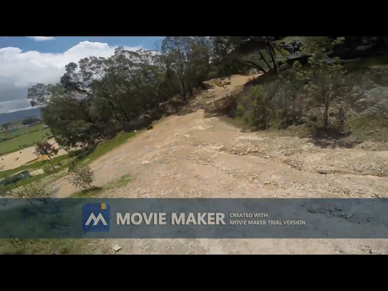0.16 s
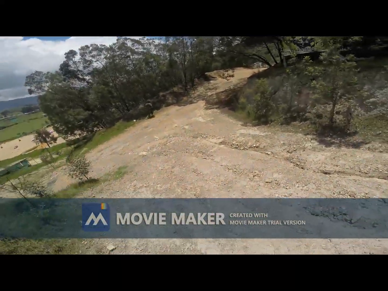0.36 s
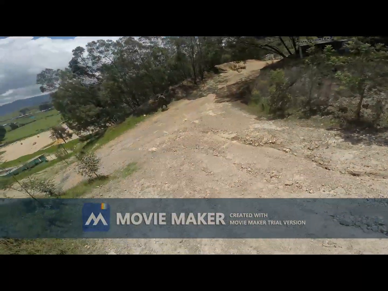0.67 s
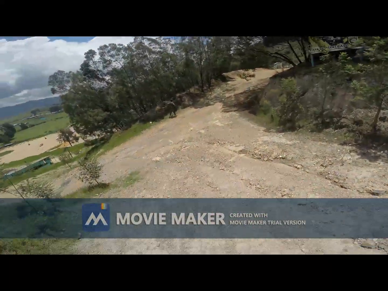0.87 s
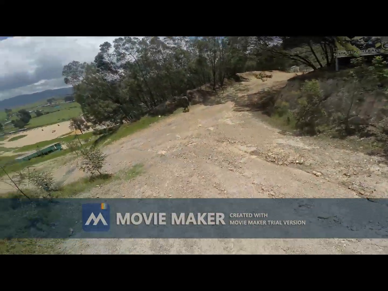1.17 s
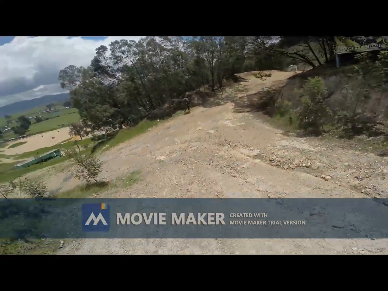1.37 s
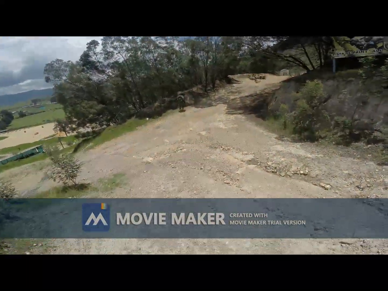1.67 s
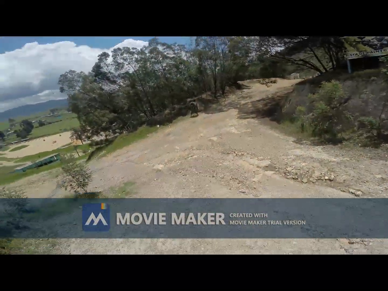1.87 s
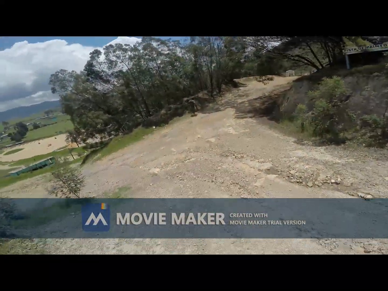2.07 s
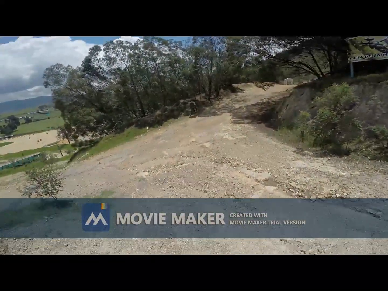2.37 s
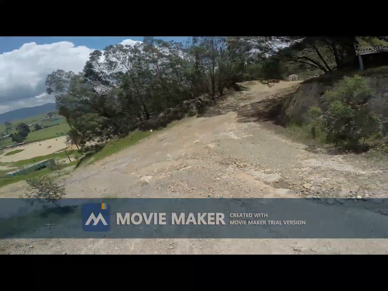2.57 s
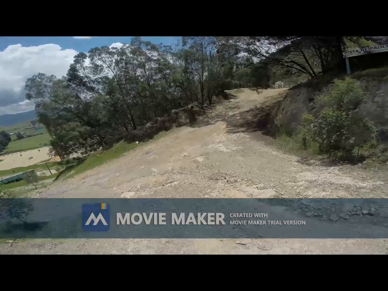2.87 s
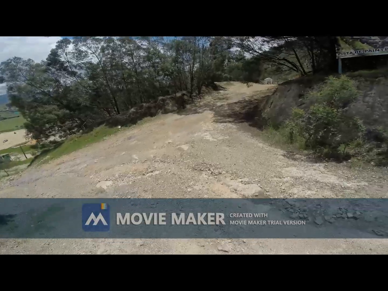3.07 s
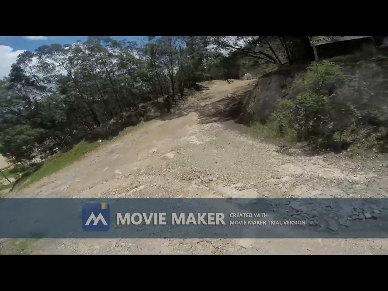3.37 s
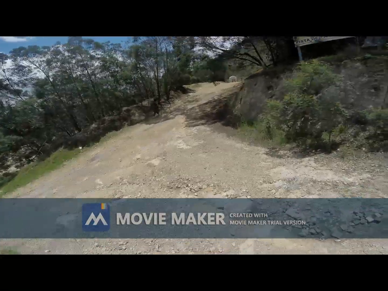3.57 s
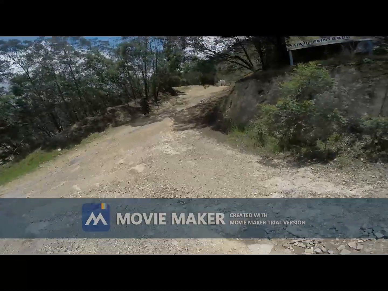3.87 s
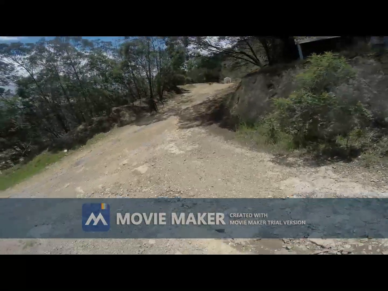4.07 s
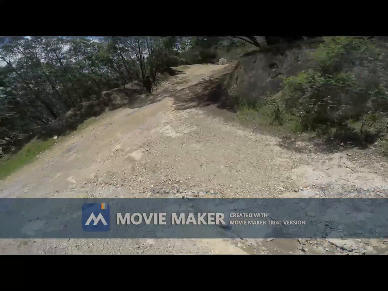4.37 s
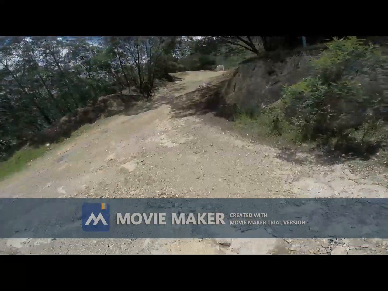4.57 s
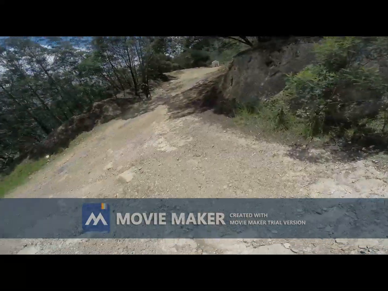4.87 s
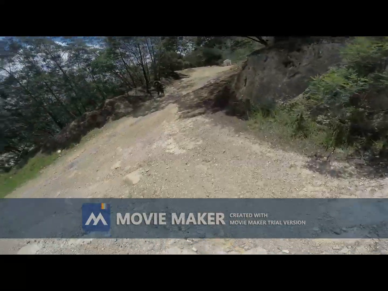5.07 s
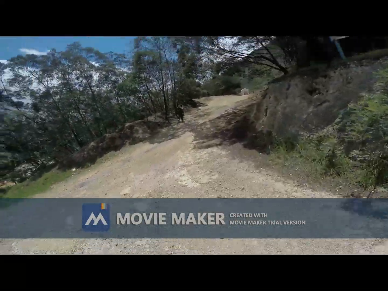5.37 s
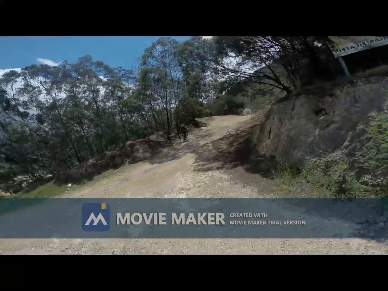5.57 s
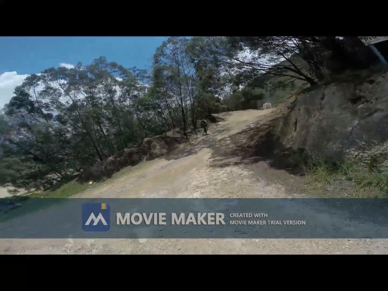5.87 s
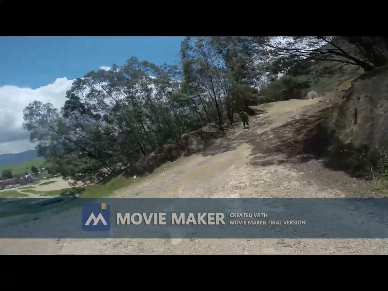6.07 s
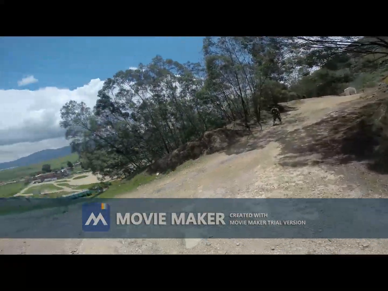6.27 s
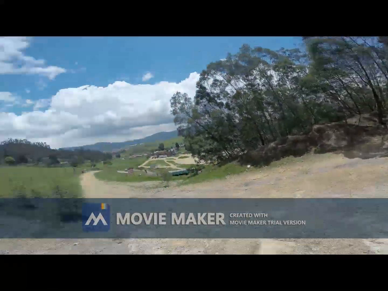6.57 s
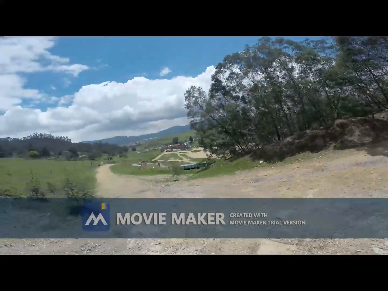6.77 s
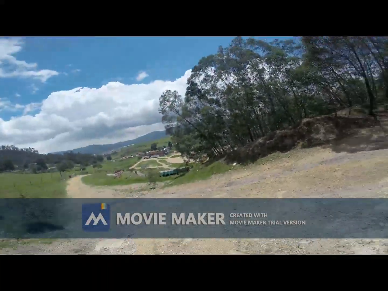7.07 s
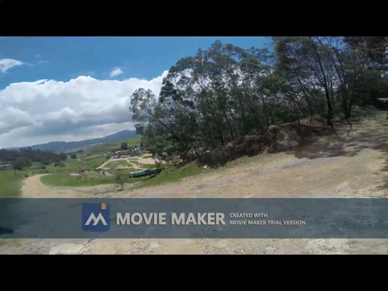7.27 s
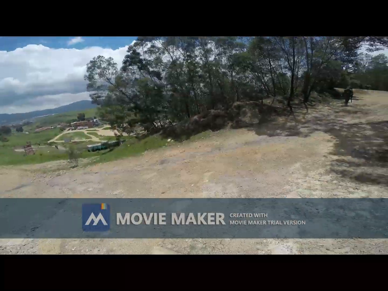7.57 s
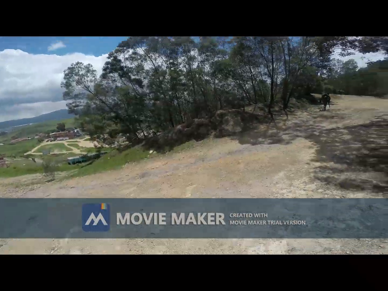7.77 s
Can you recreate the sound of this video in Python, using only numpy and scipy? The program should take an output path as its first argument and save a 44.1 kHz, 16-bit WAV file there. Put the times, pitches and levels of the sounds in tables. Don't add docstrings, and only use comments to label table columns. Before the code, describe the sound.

A faint steady amplifier hiss with very thin high whines runs throughout. From about 0.2 s a hurrying person's strides shake a sealed, chest-worn camera: deep, close thuds that wobble below the bass, a loose joint knocking, low lumpy strap rub and dry plastic ticks. Light gritty ticks come near 0.5 s and a bright case slap at 0.93. Strong thuds and knocks follow at about 1.3, 1.9, 2.25 and 2.95 s, the last with slaps and crisp grit. Bumps continue at 3.25 and 3.65, then soften from 4 to 5 s, mostly low sways and small ticks. Heavy knocks return at 5.35, 5.9 and 6.4. A kicked stone makes a small double crack at 6.57 s with a short scattered echo; more thuds at 6.95 and 7.4 bring a loose plastic slap, a fainter stone crack follows at 7.64, and a last low bounce lands near 7.9.

```python
import sys
import numpy as np
from scipy import signal
from scipy.fft import rfft, irfft, next_fast_len
from scipy.io import wavfile
from scipy.ndimage import map_coordinates

SR = 44100
rng = np.random.default_rng(int(sys.argv[2]) if len(sys.argv) > 2 else 0)


def master(y):
    cut = np.clip(np.atleast_2d(y).T, -1, 1)
    pcm = np.round(cut * 32767)
    wavfile.write(sys.argv[1], SR, pcm.astype(np.int16))


def voltage_ratio(decibels):
    exponent = np.asarray(decibels, float) / 20
    return 10 ** exponent


N = 349868

# start in seconds, peak in dB, recoil in Hz.
KNOCKS = [(0.218, -12, 92), (1.018, -12.5, 84), (1.2875, -3, 91), (1.594, -12.5, 98), (1.93, -5, 100),
          (2.2664, -4.5, 94.6), (2.333, -15.5, 79), (2.768, -18, 93), (2.9684, -4, 90), (3.155, -17, 102),
          (3.213, -22.5, 80), (3.376, -16.5, 97), (3.687, -5, 100), (3.766, -11, 92), (4.159, -8.5, 90.5),
          (5.377, -4, 92), (5.928, -5.5, 98.4), (6.409, -2.5, 97), (6.481, -8.5, 92), (6.965, -9.5, 81.6),
          (7.532, -15.5, 90)]


def unit(x):
    return x / np.sqrt(np.mean(x ** 2) + 1e-20)


def coloured(x, spectrum):
    m = next_fast_len(len(x) + 8192)
    hz, db = np.transpose(spectrum)
    log_f = np.log(np.fft.rfftfreq(m, 1 / SR) + 1)
    gain = voltage_ratio(np.interp(log_f, np.log(hz + 1), db))
    return irfft(rfft(x, m) * gain, m)[:len(x)]


def band(x, low_hz, high_hz):
    return signal.sosfilt(signal.butter(4, [low_hz, high_hz], "band", fs=SR, output="sos"), x)


def wobble(rate):
    return map_coordinates(rng.standard_normal(int(N * rate / SR) + 4), [np.arange(N) * rate / SR])


def add(track, s, sound):
    part = track[round(s * SR):][:len(sound)]
    part += sound[:len(part)]


def ring(modes, t, t60):
    out = np.zeros(len(t))
    for hz, db in modes:
        decay = voltage_ratio(db + rng.normal(0, 3) - 60 * t / t60)
        out += decay * np.sin(2 * np.pi * hz * rng.normal(1, .025) * t)
    return out


def camera():
    # frequency in Hz, density in dB per Hz.
    hiss_spectrum = [(100, -30), (200, 0.0), (300, -2.0), (500, -6.0), (900, -9.0), (1500, -12.0),
                     (2200, -14.0), (3300, -14.0), (4300, -19.0), (6000, -22.0), (7000, -25.0),
                     (9500, -29.0), (12500, -35.0), (15800, -46.0)]
    # frequency in Hz, level in dB.
    whines = [(5844, -80), (8781, -77), (11688, -88), (11718, -82), (14626, -90)]
    hiss = voltage_ratio(-58 + wobble(3)) * unit(coloured(rng.standard_normal(N), hiss_spectrum))
    t = np.arange(N) / SR
    whine = sum(voltage_ratio(db + wobble(8)) * np.sin(2 * np.pi * hz * t) for hz, db in whines)
    return hiss + whine


def clothes():
    # time of the peak in seconds, peak in dB.
    rubs = [(0.22, -28.5), (1.06, -38), (1.319, -26), (1.591, -24), (1.922, -18.5), (2.36, -27.5),
            (2.6, -32), (3.09, -34), (3.31, -26), (3.661, -26), (4.04, -43), (4.2, -27.5), (4.5, -38.5),
            (4.86, -37), (5.46, -37.5), (5.922, -18.5), (6.342, -33), (6.52, -23), (7.0, -24.5),
            (7.44, -20.5), (7.92, -28)]
    # frequency in Hz, density in dB per Hz.
    cloth_spectrum = [(20, -27), (40, 3), (90, -8.5), (150, -16), (220, -29), (320, -30.5), (700, -56.5),
                      (1500, -120)]
    rise_db_per_s, fall_db_per_s, rustle_db = 168.5, 179, -49
    t = np.arange(N) / SR
    drag = voltage_ratio(rustle_db)
    for s, db in rubs:
        drag = drag + voltage_ratio(db + np.minimum(rise_db_per_s * (t - s), fall_db_per_s * (s - t)))
    lumps = voltage_ratio(5.1 * wobble(25))
    return drag * unit(lumps * coloured(rng.standard_normal(N), cloth_spectrum))


def stones():
    # start in seconds, peak in dB.
    kicks = [
        (6.567, -24),
        (7.638, -29.5),
    ]
    # frequency in Hz, density in dB per Hz.
    stone_spectrum = [(900, -19), (1500, -7.5), (2000, -12.5), (2500, -6), (3100, 4), (3700, -8.5),
                      (4600, -26.5), (5500, -17.5), (6300, -9.5), (7000, -16.5), (7600, -17),
                      (10400, -30.5), (13000, -28), (15800, -75)]
    far_spectrum = [(hz, .72 * db) for hz, db in stone_spectrum]
    out, t = np.zeros(N), np.arange(SR // 2) / SR
    for s, db in kicks:
        crack = np.tanh(t / .001) * voltage_ratio(-4 - 60 * t / .011)
        crack += voltage_ratio(-60 * np.abs(t - .0035) / .008)
        scatter = voltage_ratio(-13 - 60 * t / .09)
        bank = voltage_ratio(-31 - 60 * t / .45) + voltage_ratio(-36) * np.exp(-((t - .075) / .025) ** 2)
        near = (crack + scatter) * unit(coloured(rng.standard_normal(len(t)), stone_spectrum))
        far = bank * unit(coloured(rng.standard_normal(len(t)), far_spectrum))
        add(out, s, voltage_ratio(db) * (near + far))
    return out


def contacts():
    # start in seconds, walls in dB.
    taps = [(0.1778, -45), (0.226, -42.5), (0.333, -51.5), (0.56, -45), (0.5902, -38), (0.9815, -39),
            (1.2723, -36), (1.9078, -37.5), (1.97, -44), (2.3045, -45), (2.4454, -51.5), (2.531, -42.5),
            (2.9354, -31), (3.0048, -45), (3.6474, -42), (4.819, -39), (6.362, -38), (6.3902, -41),
            (6.4315, -45), (6.4494, -46), (6.551, -40.5), (6.9045, -37.5), (7.082, -41), (7.8926, -45)]
    # start in seconds, walls in dB.
    ticks = [(1.1374, -45), (1.2454, -43), (1.2532, -40), (1.5495, -38), (1.5724, -41), (1.6049, -39),
             (1.981, -45), (2.6106, -47.5), (3.279, -43.5), (4.061, -48), (4.075, -47), (4.0965, -48),
             (4.3711, -44.5), (4.9888, -49), (5.851, -49), (5.8645, -47.5), (5.909, -51), (5.961, -39),
             (6.3409, -44), (6.509, -52), (6.689, -50.5), (7.4714, -44), (7.912, -50)]
    # start in seconds, walls in dB, lid over walls in dB, slack in seconds.
    slaps = [
        (0.9344, -22, -0.5, .0105),
        (1.8874, -34, -11.5, .01),
        (2.2249, -22, -7.5, .008),
        (2.914, -26.5, -6, .0075),
        (5.343, -30, -4, .008),
        (7.4142, -26, -3, .0144),
    ]
    # start in seconds, lid in dB, buttons in dB, spit in dB.
    grit = [(0.2652, -67, -61, -74), (0.497, -55, -80, -88), (0.508, -47, -80, -82), (0.521, -43, -74, -78),
            (0.5383, -50, -73, -80), (1.2726, -60, -59, -74), (1.308, -52, -56, -74),
            (1.9506, -54, -57, -80), (2.2803, -45, -53, -56.5), (2.9533, -52, -50.5, -52),
            (2.9809, -42, -45, -46), (2.986, -50, -49, -55), (3.0344, -50.5, -55, -68),
            (6.2862, -53, -63, -73.5), (6.306, -57, -65, -79.5), (7.375, -80, -61, -82)]
    tap_lid_db, tick_lid_db, jar_lid_db = -7, -15, -15.5
    lid_hz, grit_hz = 2350, 3100

    def plain(s, db, lid_db):
        lid = db + lid_db
        return s, db, lid, lid - 26, -80, lid_hz * rng.normal(1, 0.038)

    rows = [plain(s, -23 + 1.65 * db, jar_lid_db) for s, db, hz in KNOCKS]
    rows += [plain(s, db, tap_lid_db) for s, db in taps]
    rows += [plain(s, db, tick_lid_db) for s, db in ticks]
    for s, db, lid_over_db, slack_s in slaps:
        lid = db + lid_over_db
        rows.append(plain(s - slack_s, db - 17, tap_lid_db))
        rows.append(plain(s + 1.7 * slack_s, db - 17, tap_lid_db))
        rows.append((s, db, lid, lid - 18, lid - 44, lid_hz))
    rows += [(s, lid - 10, lid, buttons, spit, grit_hz) for s, lid, buttons, spit in grit]
    return rows


def case():
    # frequency in Hz, level in dB.
    wall_modes = [(730, -18), (940, -0.5), (1150, -7), (1350, 2.5), (1560, -6.5)]
    # frequency in Hz, level in dB.
    button_modes = [(5100, -10.5), (5700, -9.5), (6300, -15), (7500, -12)]
    out, t = np.zeros(N), np.arange(SR // 12) / SR
    head = round(.005 * SR)

    def struck(blows, modes, t60):
        return signal.fftconvolve(blows, ring(modes, t, t60))[:len(t)]

    for s, wall_db, lid_db, button_db, spit_db, lid_hz in contacts():
        chatter = np.exp(-((t - .0014) / 0.0012) ** 2)
        rattle = voltage_ratio(-12 - 60 * t / .11) * (rng.random(len(t)) < .1)
        blows = (chatter + rattle) * rng.standard_normal(len(t))
        dull_db = .4 * np.clip(lid_db - wall_db + 14, -12, 4)
        walls = [(hz, db + dull_db * np.log2(hz / 1000)) for hz, db in wall_modes]
        lid = [(lid_hz, 0), (1.3 * lid_hz, -11)]
        parts = [(wall_db, band(struck(blows, walls, .011), 500, 1900)),
                 (lid_db, band(struck(blows, lid, .008), 1800, 4000)),
                 (button_db, band(struck(blows, button_modes, .004), 4400, 8500)),
                 (spit_db, band(blows, 8500, 15000))]
        add(out, s, sum(voltage_ratio(db) * p / np.std(p[:head]) for db, p in parts))
    return out


def mount():
    # start in seconds, swing in dB, frequency in Hz.
    sways = [(0.172, -13.5, 18.6), (0.521, -16.5, 22), (0.926, -6, 22.2), (1.031, -8.5, 21.2),
             (1.242, -6, 19.5), (1.537, -12.5, 18.9), (1.638, -16, 17.7), (1.852, -19, 25),
             (1.933, -7.5, 19.3), (2.267, -7.5, 20), (2.487, -13, 21.6), (2.605, -14.5, 23.8),
             (2.954, -8, 17.4), (3.252, -6.5, 23.4), (3.276, -11.5, 20.4), (3.643, -9, 20.4),
             (4.063, -10.5, 22), (4.272, -18.5, 20), (4.372, -20.5, 19), (4.489, -15, 20.8),
             (4.806, -12, 19.6), (5.331, -8, 18), (5.883, -9.5, 18.7), (6.409, -7, 18), (6.852, -18.5, 29),
             (6.935, -8, 18.8), (7.408, -7, 19.8), (7.437, -22, 17), (7.467, -12, 20.8)]
    # start in seconds, peak in dB, frequency in Hz.
    bounces = [(0.924, -6, 34), (0.967, -15, 40), (1.249, -19, 29.8), (1.53, -17, 35.4), (1.555, -11, 47),
               (1.885, -1, 25), (1.889, -9, 47.5), (1.946, -32, 26.2), (2.221, 2.5, 24.8),
               (2.234, -3.5, 52.3), (2.254, -9.5, 31.8), (2.268, -25.5, 54), (2.453, -10, 41),
               (2.918, 1.5, 26.5), (2.959, -8, 70), (2.981, -7.5, 46.3), (3.26, -18, 51.3),
               (3.651, -9, 45.3), (4.368, -10, 58), (4.774, -11.5, 45.2), (5.853, -13, 22),
               (5.867, -8.5, 58.4), (6.369, -4.5, 31.7), (6.387, -12.5, 75.0), (6.515, -21.5, 55),
               (7.339, -13.5, 47), (7.452, -11.5, 58), (7.827, -13.5, 28.4), (7.919, -3.5, 47.6)]
    # start in seconds, peak in dB, recoil in Hz.
    nudges = [(0.504, -25, 53), (0.537, -20.5, 58), (0.938, -11.5, 114), (0.946, -14.5, 58),
              (1.257, -13, 55.6), (2.924, -9.5, 50.7), (2.942, -11.5, 127), (4.029, -18, 47.7),
              (4.826, -26, 90), (4.99, -34, 100), (5.345, -13, 56.7), (6.686, -17, 61.6), (7.416, -20, 120)]
    # frequency in Hz, level under the knock in dB.
    joint_modes = [(200, -13), (245, -24), (358, -17), (560, -19.5)]
    out, t = np.zeros(N), np.arange(SR) / SR
    for s, db, hz in sways:
        add(out, s, voltage_ratio(db - 60 * t / .65) * np.sin(2 * np.pi * hz * t) * np.tanh(t / .008))
    for s, db, hz in bounces:
        onset = 1 - np.exp(-t / 0.0051)
        add(out, s, voltage_ratio(db - 60 * t * hz / 5) * np.sin(2 * np.pi * hz * t) * onset)
    for s, db, hz in KNOCKS + nudges:
        stroke = np.exp(-((t * hz - .5) / .7) ** 2)
        recoil = np.cos(2 * np.pi * hz * t) * stroke
        contact = np.tanh(t / (.0008 - 0.00016 * min(db + 11, 0))) ** 2
        arm = voltage_ratio(0.79 * db) * ring(joint_modes, t, 0.057)
        add(out, s, -voltage_ratio(db) * contact * (recoil + arm))
    return out


def scene():
    return (camera() + clothes() + stones() + case() + mount())[None]


def band_limit(x):
    return signal.sosfilt(signal.butter(12, 15000, fs=SR, output="sos"), x)


def record(dry):
    x = signal.sosfilt(signal.butter(2, 10, "high", fs=SR, output="sos"), dry)
    x = x / (1 + np.abs(x / .98) ** 30) ** (1 / 30)
    return band_limit(x)


dry = scene()
out = record(dry)
master(out)
```